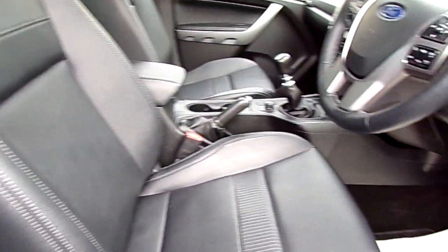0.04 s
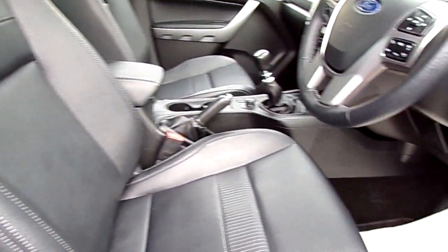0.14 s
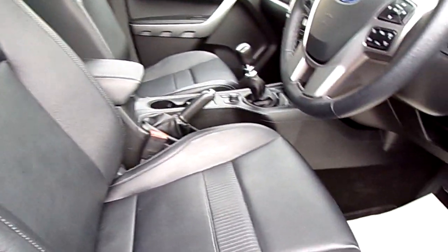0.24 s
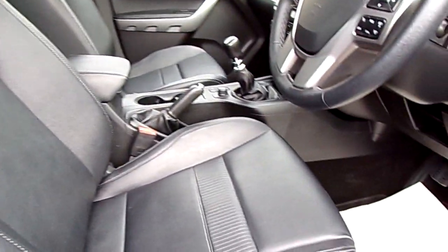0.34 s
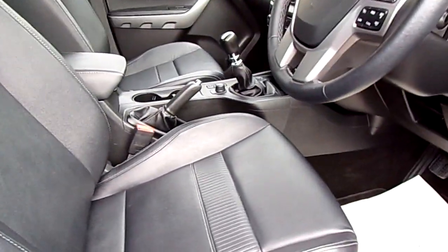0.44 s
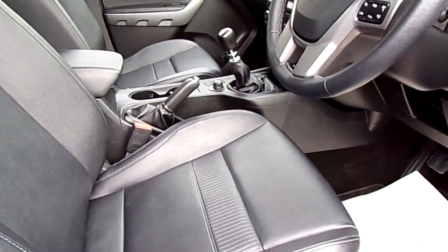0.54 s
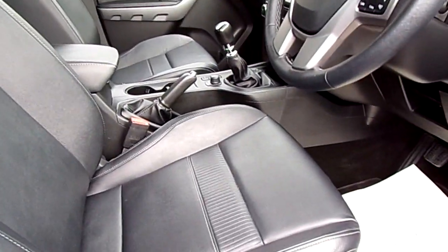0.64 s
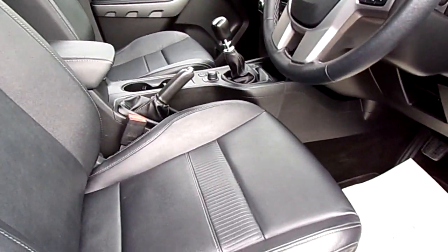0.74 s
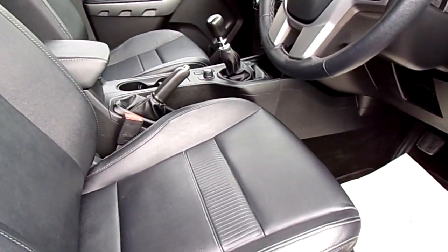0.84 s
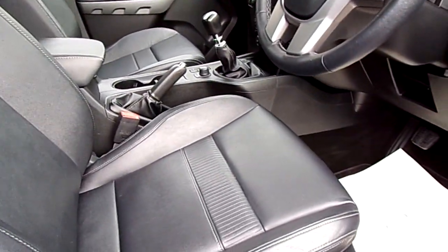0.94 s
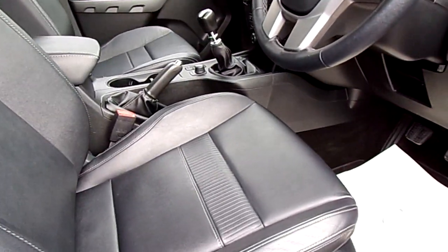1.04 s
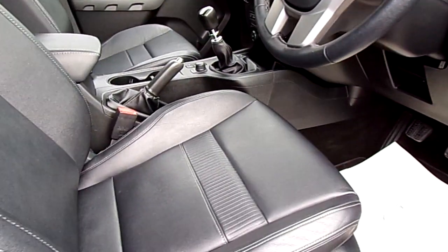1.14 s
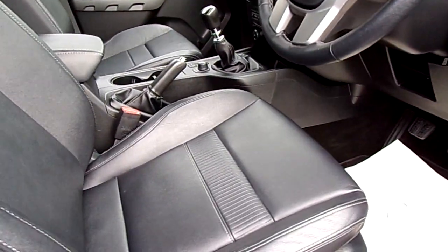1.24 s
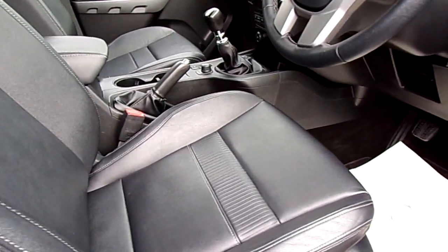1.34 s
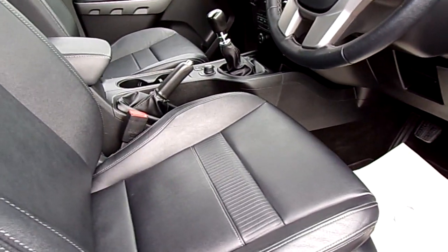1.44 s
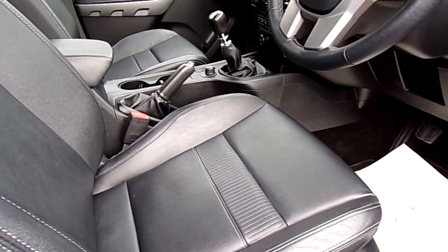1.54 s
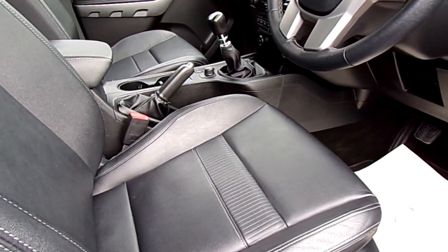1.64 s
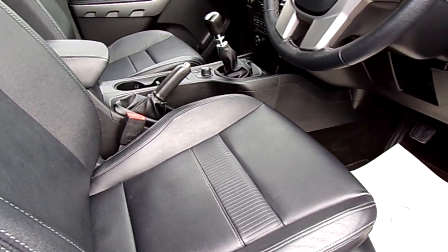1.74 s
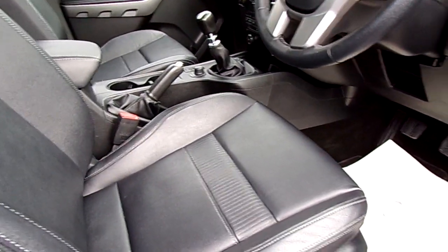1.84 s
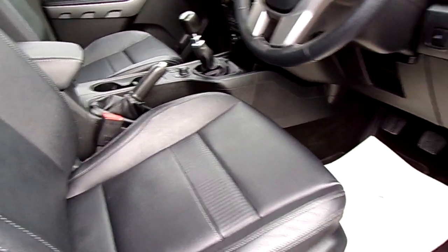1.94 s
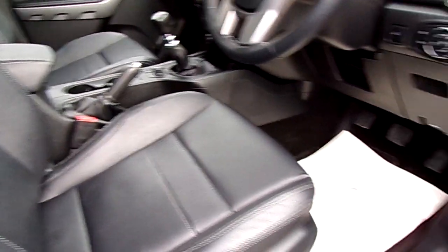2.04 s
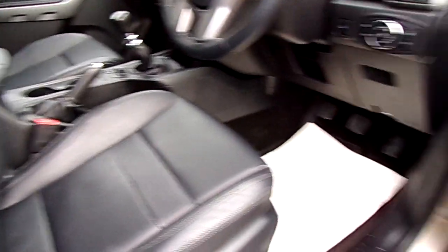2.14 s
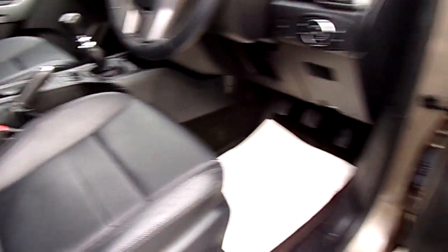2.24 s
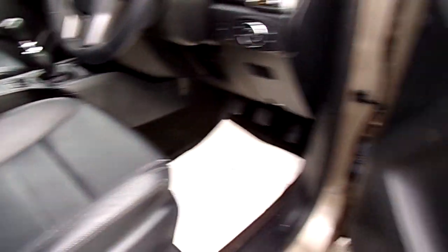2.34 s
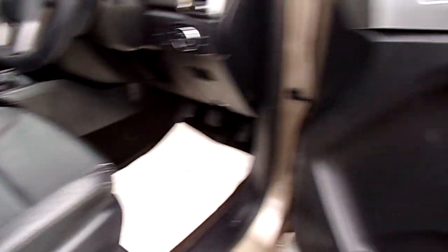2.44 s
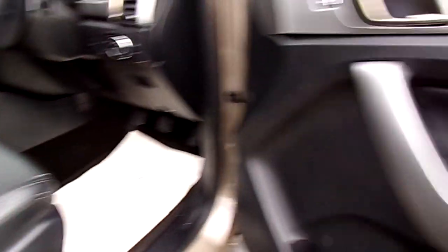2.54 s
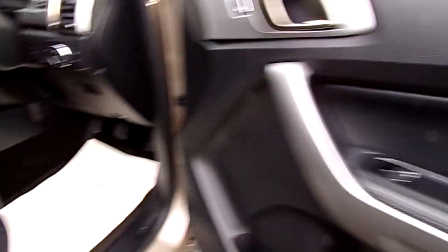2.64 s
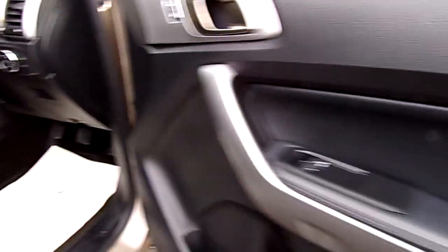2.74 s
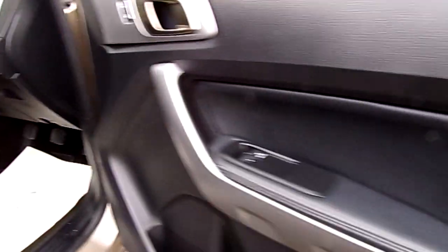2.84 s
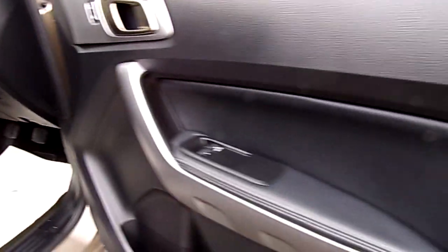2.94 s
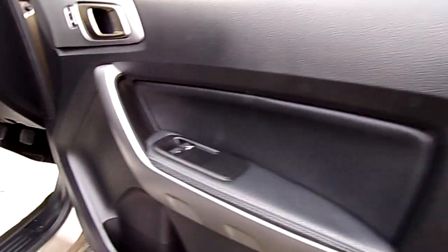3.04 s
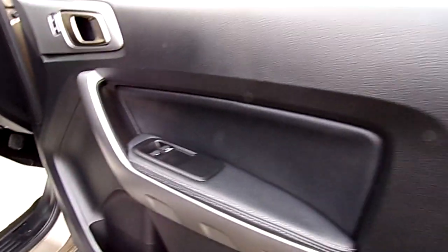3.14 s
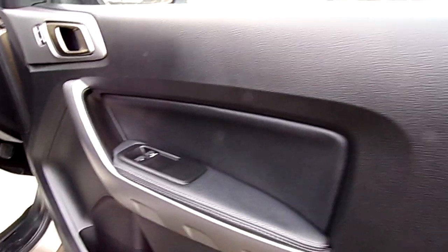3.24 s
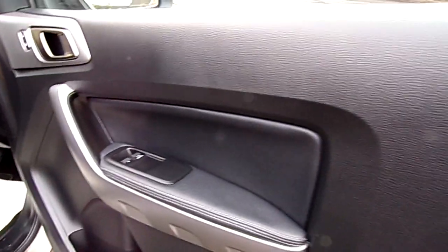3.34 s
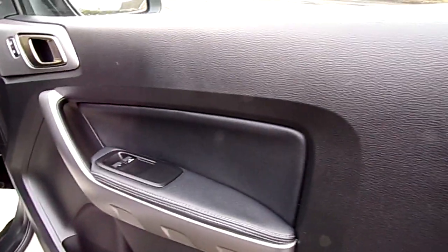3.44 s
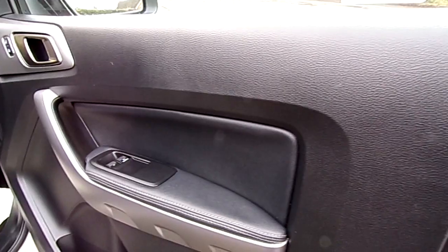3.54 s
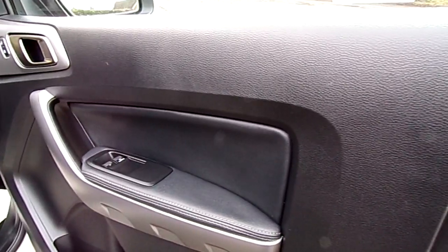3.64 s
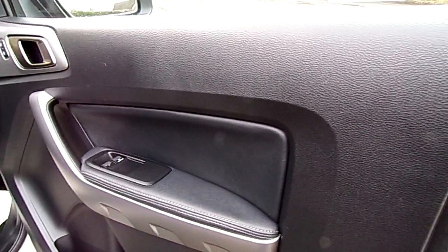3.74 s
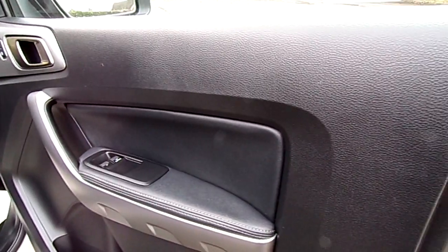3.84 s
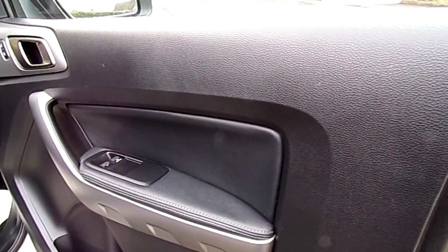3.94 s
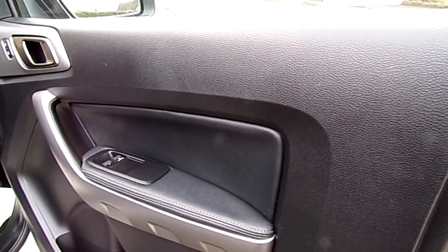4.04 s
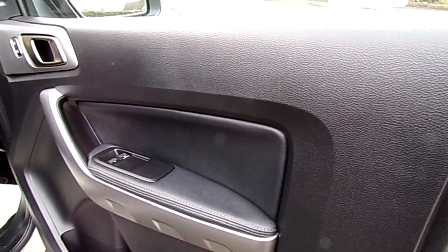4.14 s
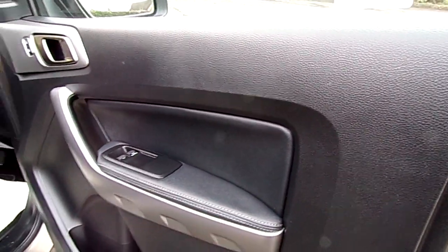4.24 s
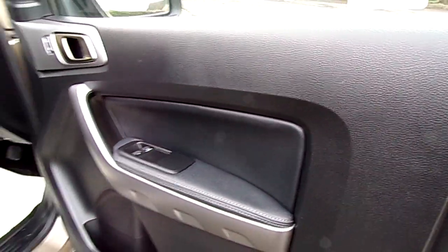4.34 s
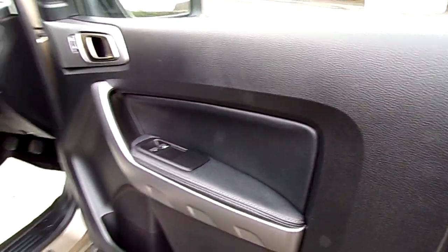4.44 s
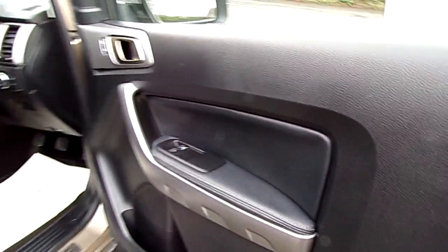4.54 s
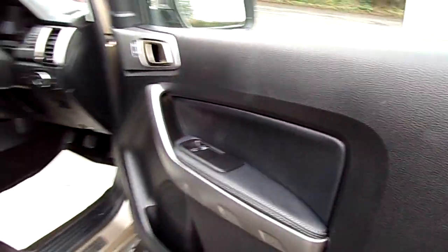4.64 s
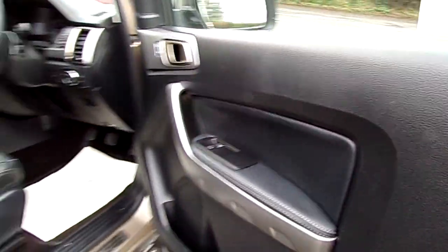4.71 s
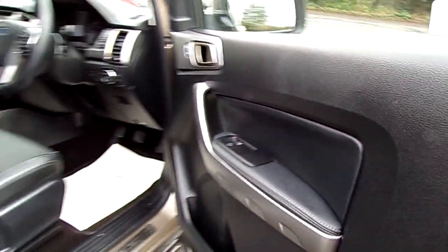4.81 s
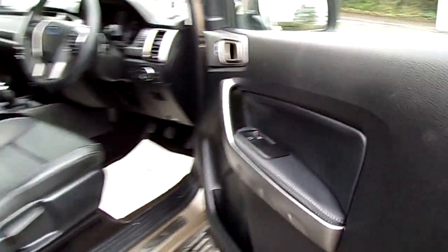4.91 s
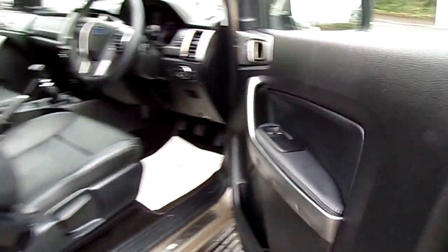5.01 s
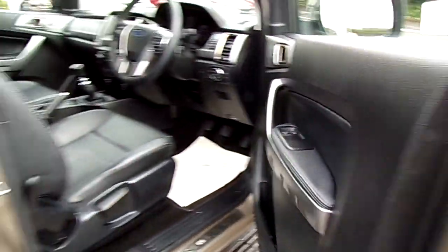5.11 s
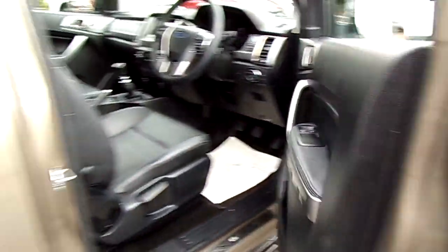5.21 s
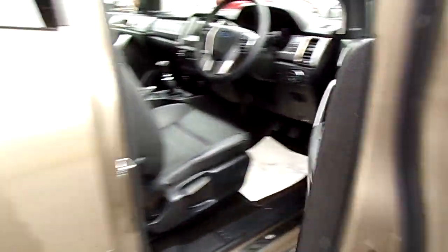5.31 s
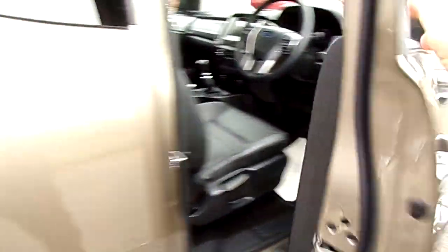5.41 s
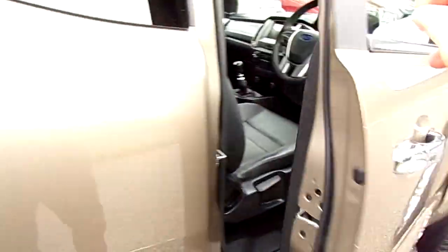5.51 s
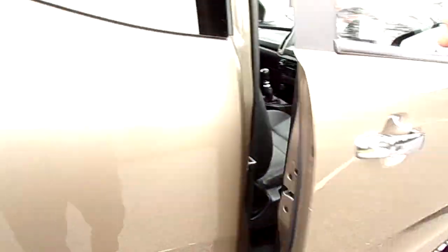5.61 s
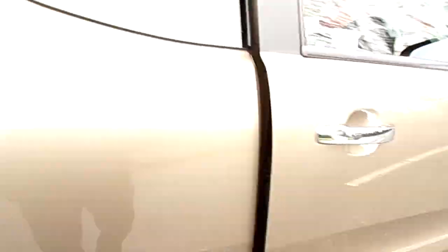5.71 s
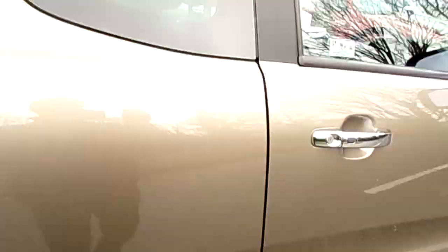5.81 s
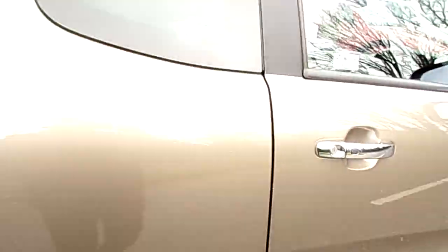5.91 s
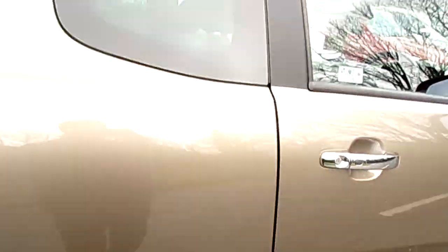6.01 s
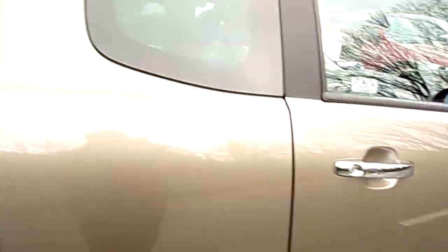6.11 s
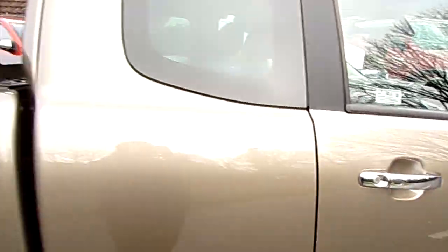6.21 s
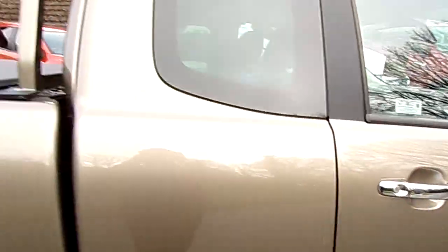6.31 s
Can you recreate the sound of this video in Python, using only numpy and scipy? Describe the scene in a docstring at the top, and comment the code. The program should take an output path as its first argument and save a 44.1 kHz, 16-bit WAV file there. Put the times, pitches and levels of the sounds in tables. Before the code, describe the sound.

A close, clipped metallic door thud opens the scene, dying quickly into dull outdoor hum and recorder hiss. Someone moves about with faint rustles and ticks while a distant bird gives high, short, sometimes buzzy notes. Tyre noise from a nearby road swells, its engine climbing in pitch, until a second, tighter door slam bursts over it, followed by small handling sounds. The handheld microphone sounds muffled in the treble.

```python
"""The lot's low hum and the recorder's own steady hiss, as shaped noise, run throughout. The rear half door of
a pickup slams close to a microphone that overloads: seal, latch and frame contacts ring panel modes and clatter
of filtered noise. A person then moves with scuffs (swelling noise) and clicks (dispersed pulses), a far bird
whistles (gliding sines), and a vehicle nears on a road, its tyres shaped noise and its engine a rough drone that
climbs in pitch. The front door slams as the vehicle passes, and the last scuffs and clicks follow."""
import sys
import numpy as np
from scipy import signal
from scipy.fft import rfft, irfft, next_fast_len
from scipy.io import wavfile

SR = 44100
rng = np.random.default_rng(int(sys.argv[2]) if len(sys.argv) > 2 else 0)


def materialize(psi):
    """Save the field psi as 16-bit PCM at rate SR to the path in sys.argv[1].

    A 1-D psi becomes a single channel; in a 2-D psi each row is a channel.
    """
    bounded = np.clip(np.atleast_2d(psi).T, -1, 1)
    quanta = np.round(bounded * 32767).astype(np.int16)
    wavfile.write(sys.argv[1], SR, quanta)


N = 280917
T = np.arange(N) / SR

# Low hum of the lot and the recorder's own steady hiss, relative spectrum: hz, level_db
BACKGROUND_SPECTRUM = [(25, -26), (45, -10), (70, -9.5), (140, -1.5), (260, -9.5), (430, -14), (800, -14),
                       (1300, -17.5), (3200, -16.5), (4400, -21), (6500, -23.5), (9000, -20.5),
                       (12000, -27), (15500, -18.5)]
# Tyres on the road, relative spectrum: hz, level_db
TYRE_SPECTRUM = [(60, -36), (150, 1.5), (300, -5.5), (480, -11), (620, -0.5), (820, 3.5), (1100, -3),
                 (1400, -1.5), (2000, -9.5), (3200, -14.5), (4400, -24.5), (6500, -27), (10000, -42)]
# Spectral tilt of the tyre roar about 1 kHz: time_s, tilt_db_per_octave
TYRE_TILT = [(1.2, 0.5), (3, 2), (4.1, 1.7), (4.6, -1.1), (5.3, 0.8)]
# Resonances of the open cab, which colour the background and the vehicle: centre_hz, width_octaves, gain_db
CAB_RESONANCES = [(486, 0.093, -2.5), (609, 0.036, 6), (684, 0.13, -5), (774, 0.029, 3.5),
                  (1012, 0.046, 3.5)]
# Contacts of each door with its seal, latch, frame and trim: start_s, force_db, part
REAR_CONTACTS = [(.0735, -7.5, "seal"), (.0775, -4, "seal"), (.0955, -6, "latch"), (.0985, 7.5, "latch"),
                 (.1015, 4, "striker"), (.107, -2.5, "frame"), (.119, 0, "trim"), (.1448, -8.5, "trim"),
                 (.15, -10, "skin"), (.188, -16.5, "trim"), (.2545, -31.5, "trim")]
FRONT_CONTACTS = [(5.6745, -0.5, "frame"), (5.6765, 4.5, "latch"), (5.6805, 4.5, "frame"),
                  (5.685, 1.5, "latch"), (5.692, -1, "latch"), (5.7135, -17.5, "trim"),
                  (5.7385, -19.5, "latch"), (5.749, -23, "frame"), (5.7745, -25.5, "trim")]
# How each part strikes: part, highpass_hz, lowpass_hz (hardness), panel_ring_db, tail_db
PART_STRIKES = [("seal", 315, 1060, 5.8, 10.4), ("latch", 1220, 7200, -16, -11),
                ("striker", 290, 2500, -2.5, -4.5), ("frame", 43, 2500, 0, -1.5),
                ("trim", 91, 5300, -1, 2.5), ("skin", 91, 880, 5, 5.2)]
# Panel modes of each door, before the force of a contact: pitch_hz, level_db, t60_s
REAR_PANEL_MODES = [(32.8, -21, 0.65), (97.3, -28, 0.4), (118.4, -21, 0.49), (143, -21, 0.34),
                    (234, -24, 0.22), (280, -33, 0.2), (376.7, -14.5, 0.12), (598.6, -14, 0.2),
                    (740, -44, 0.32), (808, -28, 0.16), (990, -26, 0.18), (1243, -25, 0.13),
                    (1565, -34, 0.12), (1790, -32, 0.048), (2070, -31, 0.12), (2460, -36, 0.19),
                    (2810, -46, 0.12)]
FRONT_PANEL_MODES = [(52.4, -35, 0.22), (95, -11, 0.071), (138, -27, 0.39), (164, -14.5, 0.085),
                     (257, -15.5, 0.14), (310, -5.5, 0.047), (613, -20, 0.24), (716, -17, 0.085),
                     (1137, -14, 0.046), (1272, -18, 0.12), (1456, -18, 0.072), (1680, -42, 0.2),
                     (2350, -22, 0.083), (2800, -41, 0.13)]
# Dense clatter of latch, trim and glass, and its tail in the cab: hz, clatter_db, tail_db, tail_t60_s
REAR_CLATTER_BANDS = [(60.3, -9, -7, 0.78), (135, -1, 5.5, 0.31), (363, 14, -5, 0.28),
                      (479, 15.5, -11.5, 0.38), (735, 1, -1.5, 0.3), (1030, 7, -11, 0.21),
                      (1400, 6, -16, 0.26), (3240, 2, -19.5, 0.27), (4300, -6.5, -28.5, 0.38),
                      (6100, -10.5, -12.5, 0.13), (14000, -10, -23, 0.24)]
FRONT_CLATTER_BANDS = [(60, -3, -8, 0.52), (153, 11, 7.5, 0.34), (317, 18.5, -4.5, 0.5),
                       (484, -6, -5.5, 0.36), (736, 7, 1, 0.23), (1410, 2.5, -17, 0.14),
                       (3040, 1, -13, 0.21), (4300, -3, -20, 0.28), (6500, -4, -23, .2),
                       (14000, -2, -30, .2)]
# Modes of the steel around each latch: pitch_hz, level_db, t60_s
REAR_LATCH_MODES = [(1004, -7.5, 0.1), (1655, -9, 0.046), (2720, -18, 0.11), (3304, 1.5, 0.025)]
FRONT_LATCH_MODES = [(768, 7.5, 0.041), (1030, -9, 0.044), (1236, -20, 0.19), (2460, -11, .04)]
# Scuffs of sleeve, shoe and door: start_s, length_s, rms_db, centre_hz
SCUFF_EVENTS = [(0.842, .16, -49, 6300), (0.998, .11, -43.5, 6100), (1.125, .12, -46, 5400),
                (1.188, 0.18, -53, 6400), (1.925, 0.18, -50, 6400), (3.143, 0.035, -40.5, 3340),
                (3.166, 0.06, -42, 2950), (5.291, 0.063, -49, 6000), (5.87, 0.069, -35.5, 6470),
                (5.911, .12, -44, 5500), (6.332, 0.03, -33.5, 3000)]
# Small handling clicks: start_s, peak_db, centre_hz
CLICK_EVENTS = [(.877, -22, 6200), (.889, -22, 6340), (.891, -25.5, 700), (2.2375, -42, 6300),
                (2.3799, -34, 2780), (2.39, -37, 6300), (2.886, -26.5, 1260), (3.345, -36, 6300),
                (3.3789, -26, 2400), (6.319, -30.5, 6640), (6.342, -27.5, 6460)]
# The bird's notes, before their arch and waver: start_s, length_s, level_db, start_hz, end_hz
BIRD_NOTES = [(2.428, .16, -57, 5400, 5220), (2.622, 0.28, -58, 6970, 6350),
              (2.909, 0.095, -51, 5720, 5130), (2.97, 0.073, -56, 4520, 4480),
              (2.999, 0.13, -55.5, 5430, 5360), (3.234, 0.082, -52, 3760, 3630),
              (3.755, .19, -52.5, 7200, 6500), (4.006, .2, -52.5, 6950, 7250), (4.27, .13, -56, 7250, 7400),
              (4.69, .085, -53, 7480, 6320), (4.907, .05, -50, 7350, 4970), (5.005, .08, -54, 5800, 5200),
              (5.115, 0.11, -46.5, 5560, 5200)]
# Microphone response: hz, gain_db
MICROPHONE_RESPONSE = [(20, -13), (40, 1.5), (6900, -1), (7700, -20.5), (11000, -24), (16000, -13.5)]
# Narrow dips of the microphone's port: centre_hz, width_octaves, gain_db
PORT_DIPS = [(3654, 0.013, -34), (4402, .022, -16.5), (8050, 0.014, -11)]

# The vehicle follows a straight road; the ground absorbs sound along the path to the lot
PASS_S, SPEED_M_PER_S, ROAD_M, GROUND_DB_PER_M = 5.774, 10.53, 13.8, 0.17
TYRES_DB = -39  # at the nearest point, before the tilt
# The engine revs up once and grows louder with its firing rate; its level is that at the nearest point
CRUISE_HZ, REVVED_HZ, REV_MIDDLE_S, REV_SPREAD_S = 99, 137.3, 4.78, 0.52
ENGINE_DB, ENGINE_DB_PER_OCTAVE = -50, 16.5
# Divided by the centre in Hz, these give a width in octaves, so all events are about equally wide in Hz
SCUFF_WIDTH_OCTAVE_HZ, CLICK_WIDTH_OCTAVE_HZ = 1480, 1630
NOTE_ARCH = 0.074  # share by which pitch bows up in the middle of a note
# Fast pitch waver as a share: high notes turn buzzy
CLEAR_WAVER, BUZZ_WAVER, BUZZ_ABOVE_HZ, BUZZ_BLEND_HZ = .006, 0.0256, 6600, 250
WARBLE = 0.0072  # slower wobble of every note, as a share of its pitch
EDGE_HZ = 15800  # upper band limit of the microphone's output


def amp(db):
    """Logarithmic level: decibels to amplitude gain."""
    return 10 ** (np.asarray(db) / 20)


def evened(x):
    """Normalisation of power: scales to an rms of 1."""
    return x / np.sqrt(np.mean(x ** 2) + 1e-20)


def read(points, hz):
    """Spectral interpolation on a log-frequency axis."""
    f, value = np.transpose(points)
    return np.interp(np.log(hz + 1), np.log(f + 1), value)


def step(x):
    """Sigmoid transition: a smooth step from 0 to 1 around x = 0."""
    return .5 + .5 * np.tanh(x / 2)


def add(mix, s, sound):
    """Superposition: mixes a sound in at time s."""
    part = mix[max(round(s * SR), 0):][:len(sound)]
    part += sound[:len(part)]


def shaped(x, gain):
    """Linear filtering: multiplies the spectrum of x by a gain that is a function of frequency."""
    size = next_fast_len(len(x))
    f = np.fft.rfftfreq(size, 1 / SR)
    return irfft(rfft(x, size) * gain(f), size)[:len(x)]


def hump(f, hz, octaves):
    """Broad resonance: a bell on a log-frequency axis."""
    return np.exp(-.5 * (np.log2((f + 1) / hz) / octaves) ** 2)


def coloured(x, peaks):
    """Resonant coloration: passes x through a few resonances and dips."""
    return shaped(x, lambda f: amp(sum(db * hump(f, hz, octaves) for hz, octaves, db in peaks)))


def wander(rate_hz):
    """Low-passed random fluctuation of rms 1."""
    return evened(shaped(rng.standard_normal(N), lambda f: np.exp(-(f / rate_hz) ** 2)))


def background(level_db=-49.5):
    """Stationary noise: the lot's low hum and the recorder's own steady hiss."""
    hum_and_hiss = shaped(rng.standard_normal(N), lambda f: amp(read(BACKGROUND_SPECTRUM, f)))
    return amp(level_db) * evened(hum_and_hiss)


def tyre_roar(gust_db=0.45):
    """Broadband rolling noise: a rough spectrum whose tilt drifts and whose bands flutter separately."""
    tilt_db = np.interp(T, *np.transpose(TYRE_TILT))
    roar = evened(shaped(rng.standard_normal(N), lambda f: amp(read(TYRE_SPECTRUM, f))))
    octaves = np.arange(-3, 4, 2)  # band centres, in octaves from 1 kHz
    out = np.zeros(N)
    for octave, one in zip(octaves, np.eye(len(octaves))):
        band = shaped(roar, lambda f: read(np.c_[1000 * 2. ** octaves, one], f))
        out += band * amp(TYRES_DB + tilt_db * octave + gust_db * wander(rate_hz=26.0))
    return out


def engine_drone(waver=0.04245, low_order_db=-5, drone_width_hz=32):
    """Harmonic radiation: narrow noise around the firing rate and its double climbs with the revs."""
    hz = CRUISE_HZ + (REVVED_HZ - CRUISE_HZ) * step((T - REV_MIDDLE_S) / REV_SPREAD_S)
    engine_db = ENGINE_DB + ENGINE_DB_PER_OCTAVE * np.log2(hz / CRUISE_HZ)
    uneven_hz = hz * (1 + waver * wander(rate_hz=15.26))
    turn = np.exp(2j * np.pi * np.cumsum(uneven_hz) / SR)
    out = np.zeros(N)
    for order, db in enumerate([low_order_db, 0], 1):
        flutter = wander(drone_width_hz) + 1j * wander(drone_width_hz)
        out += amp(engine_db + db) * evened((flutter * turn ** order).real)
    return out


def vehicle():
    """Spherical spreading and ground absorption: tyres and engine swell as distance shrinks."""
    metres = np.hypot(ROAD_M, SPEED_M_PER_S * (T - PASS_S))
    nearness = ROAD_M / metres * amp(-GROUND_DB_PER_M * (metres - ROAD_M))
    return nearness * (tyre_roar() + engine_drone())


def door(blows, modes, clatter, clatter_t60, swell_cycles, lag_cycles, valley_db, mode_octaves):
    """Modal excitation: each contact rings the panels and sets off clatter that dies away in the cab."""
    t = T[:SR * 4 // 5]
    ring = np.zeros(len(t))
    for hz, db, t60 in modes:
        # large slow panels need longer to reach their full swing
        swell = 1 - np.exp(-t * hz / swell_cycles)
        ring += amp(db - 60 * t / t60) * swell * np.sin(2 * np.pi * hz * t)
    hz, burst_db, cab_db, cab_t60 = np.transpose(clatter)[:, :, None]
    f = np.fft.rfftfreq(len(t), 1 / SR)
    # the clatter radiates through the panels, so it is weak between their lower modes
    near_mode = np.max([hump(f, mode[0], mode_octaves) for mode in modes], axis=0)
    radiation = amp(valley_db * (1 - near_mode) * hump(f, 780, 1.35))
    bands = radiation * np.array([read(np.c_[hz, one], f) for one in np.eye(len(hz))])
    # bending waves carry the treble through the steel sooner than the bass
    rise = 1 - np.exp(-t * hz / lag_cycles)
    burst = rise * amp(burst_db - 60 * t / clatter_t60)
    tail = rise * amp(cab_db - 60 * t / cab_t60)
    out = np.zeros(N)
    for s, force_db, part in blows:
        low_hz, top_hz, ring_db, tail_db = next(row[1:] for row in PART_STRIKES if row[0] == part)
        grains = irfft(rfft(rng.choice([-1., 1.], len(t))) * bands, len(t))
        rattling = (grains * (burst + amp(tail_db) * tail)).sum(0)
        sound = rattling + amp(ring_db) * ring
        # light parts cannot move the big panels; rubber cannot excite the treble
        sound = signal.lfilter(*signal.butter(2, low_hz, "high", fs=SR), sound)
        sound = signal.lfilter(*signal.butter(2, min(top_hz, SR / 3), fs=SR), sound)
        add(out, s, amp(force_db) * sound)
    return out


def latch(home_s, modes, rise_s=0.0023):
    """Damped free vibration: the latch snaps home and the steel around it rings briefly."""
    out, t = np.zeros(N), T[:SR // 3]
    ring = sum(amp(db - 60 * t / t60) * np.sin(2 * np.pi * hz * t) for hz, db, t60 in modes)
    add(out, home_s, (1 - np.exp(-t / rise_s)) * ring)
    return out


def rattle(start_s, first_db, fade_db_per_s, gap_s, count, jitter=.15):
    """Repeated impact with energy loss: loose trim and glass chatter unevenly, ever weaker."""
    delays = gap_s * (np.arange(count) + jitter * rng.uniform(-1, 1, count))
    return [(start_s + delay, first_db - fade_db_per_s * delay, "trim") for delay in delays]


def scuffs(grain_db=2.5):
    """Sliding friction: swells of uneven fine grains, with a weak broad skirt around the main hiss."""
    out, grip = np.zeros(N), amp(grain_db * wander(rate_hz=95))
    for s, length, db, hz in SCUFF_EVENTS:
        noise = rng.standard_normal(int(length * SR))
        width = SCUFF_WIDTH_OCTAVE_HZ / hz
        hiss = evened(shaped(noise, lambda f: hump(f, hz, width) + 0.37 * hump(f, hz, 2.1)))
        add(out, s, amp(db) * hiss * signal.windows.tukey(len(hiss), .9))
    return out * evened(grip)


def clicks(spread_s=0.0042, spread_hz=2200, tail_db=-27, tail_t60=0.044):
    """Dispersion: sharp ticks whose bass arrives a few milliseconds after their treble."""
    out, t = np.zeros(N), T[:4096]
    f = np.fft.rfftfreq(len(t), 1 / SR)
    lead = 128 / SR  # room for the onset ahead of the tick
    delay = lead + spread_s * np.exp(-f / spread_hz)
    phase = -2 * np.pi * np.cumsum(delay) * f[1]
    for s, db, hz in CLICK_EVENTS:
        tick = irfft(hump(f, hz, CLICK_WIDTH_OCTAVE_HZ / hz) * np.exp(1j * phase))
        tail = rng.standard_normal(len(t)) * amp(tail_db - 60 * t / tail_t60)
        tick = tick + signal.fftconvolve(tick, tail)[:len(t)]
        add(out, s - lead, amp(db) * tick / abs(tick).max())
    return out


def bird(echo_db=-38, echo_t60=.45):
    """Frequency modulation: arched whistles, clear when low and buzzy when high, with faint echoes."""
    out, unsteady, wobble = np.zeros(N), wander(rate_hz=173), wander(rate_hz=36)
    for s, length, db, start_hz, end_hz in BIRD_NOTES:
        u = np.linspace(0, 1, int(length * SR))
        glide_hz = start_hz + (end_hz - start_hz) * u
        hz = glide_hz * (1 + NOTE_ARCH * np.sin(np.pi * u))
        waver = CLEAR_WAVER + (BUZZ_WAVER - CLEAR_WAVER) * step((hz - BUZZ_ABOVE_HZ) / BUZZ_BLEND_HZ)
        now = slice(int(s * SR), int(s * SR) + len(u))
        hz = hz * (1 + waver * unsteady[now] + WARBLE * wobble[now])
        whistle = np.sin(2 * np.pi * np.cumsum(hz) / SR)
        add(out, s, amp(db) * signal.windows.tukey(len(u), .5) * whistle)
    # diffuse reflections from around the lot
    fade = amp(-60 * T[:SR // 2] / echo_t60)
    echoes = rng.standard_normal(SR // 2) * amp(echo_db) * fade
    return out + signal.fftconvolve(out, echoes)[:N]


def tread(peak_s=4.6, spread_s=0.37, level_db=-48, centre_hz=800, octaves=0.064):
    """Narrow-band tread noise: the tyres' song swells and fades once during the approach."""
    song = evened(shaped(rng.standard_normal(N), lambda f: hump(f, centre_hz, octaves)))
    return amp(level_db) * np.exp(-.5 * ((T - peak_s) / spread_s) ** 2) * song


def scene():
    """Superposition of the background, both doors, the person's movements, the bird and the vehicle."""
    surroundings = coloured(background() + vehicle() + tread(), CAB_RESONANCES) + bird()
    rear_blows = REAR_CONTACTS + rattle(start_s=.112, first_db=-8.5, fade_db_per_s=145, gap_s=.021, count=5)
    front_blows = FRONT_CONTACTS + rattle(start_s=5.699, first_db=-16.5, fade_db_per_s=175, gap_s=.024, count=3)
    rear = door(rear_blows, REAR_PANEL_MODES, REAR_CLATTER_BANDS, clatter_t60=0.027,
                swell_cycles=2.7, lag_cycles=1.5, valley_db=-6, mode_octaves=0.083)
    front = door(front_blows, FRONT_PANEL_MODES, FRONT_CLATTER_BANDS, clatter_t60=0.04,
                 swell_cycles=0.2, lag_cycles=0.51, valley_db=-7, mode_octaves=0.12)
    latches = latch(.099, REAR_LATCH_MODES) + latch(5.6865, FRONT_LATCH_MODES)
    return (rear + front + latches + scuffs() + clicks() + surroundings)[None]


def record(dry):
    """Transducer response and saturation: microphone colour, hard clipping, then the band limit."""
    padded = np.pad(dry[0], (0, SR // 10))  # keeps the filter from wrapping the end onto the start
    heard = shaped(padded, lambda f: amp(read(MICROPHONE_RESPONSE, f)))[:N]
    clipped = np.clip(coloured(heard, PORT_DIPS), -1, 1)
    band_limit = signal.firwin(511, EDGE_HZ, window=("kaiser", 9), fs=SR)
    return signal.oaconvolve(clipped, band_limit, "same")[None]


dry = scene()
out = record(dry)
materialize(out)
```